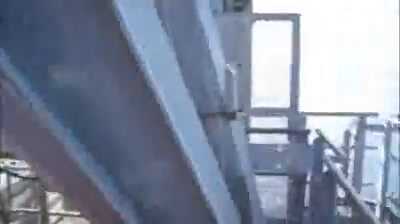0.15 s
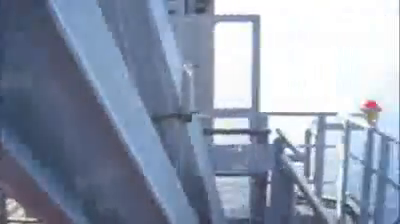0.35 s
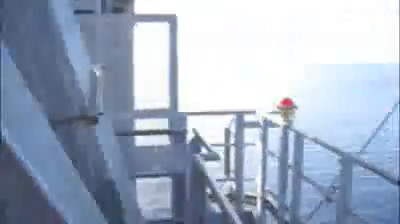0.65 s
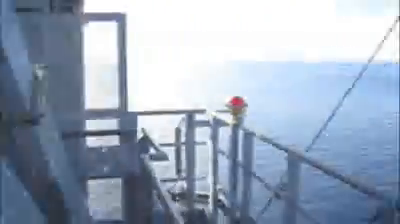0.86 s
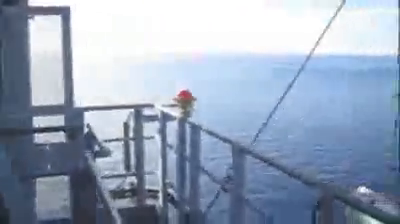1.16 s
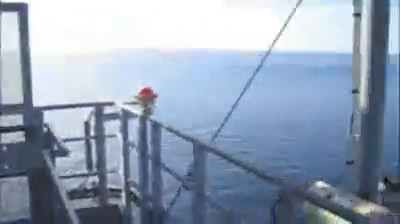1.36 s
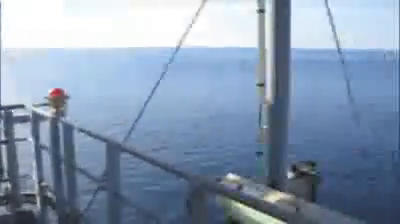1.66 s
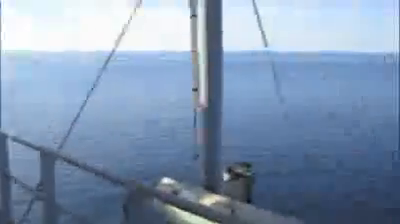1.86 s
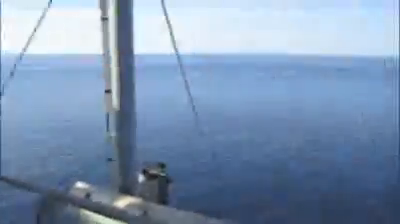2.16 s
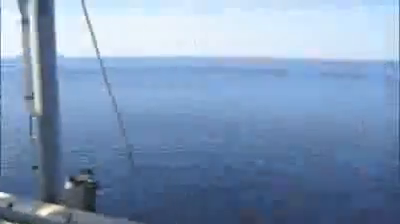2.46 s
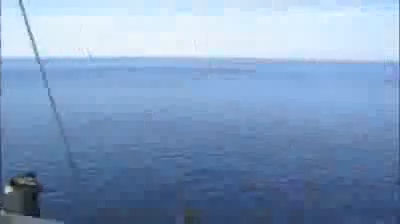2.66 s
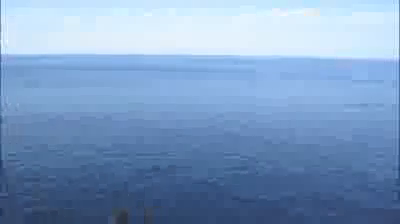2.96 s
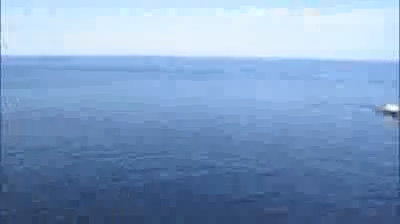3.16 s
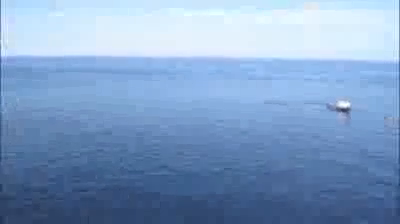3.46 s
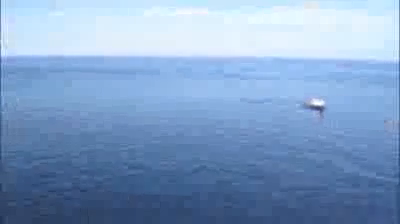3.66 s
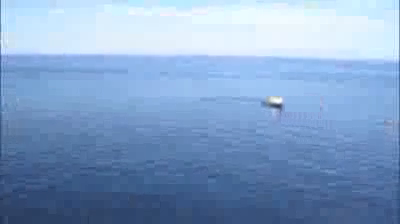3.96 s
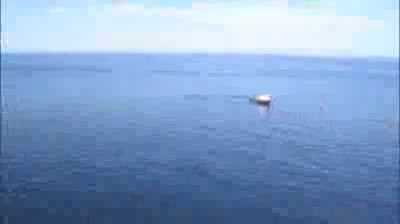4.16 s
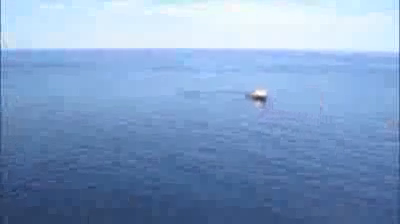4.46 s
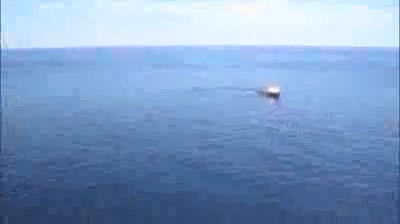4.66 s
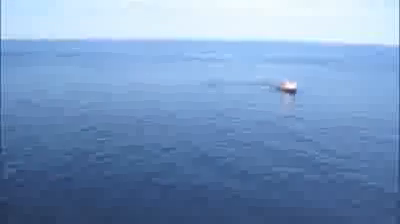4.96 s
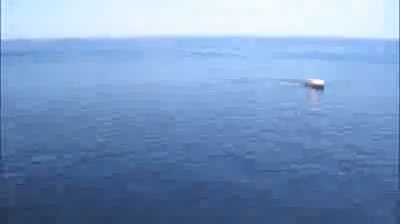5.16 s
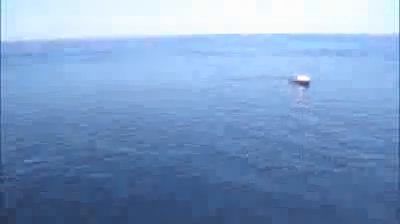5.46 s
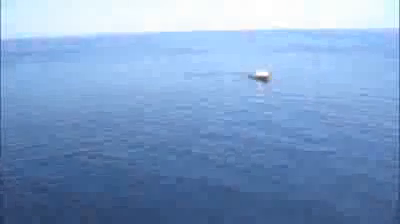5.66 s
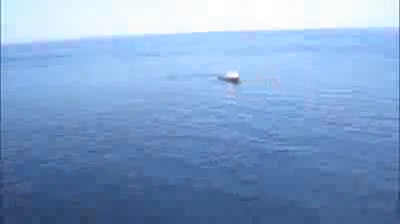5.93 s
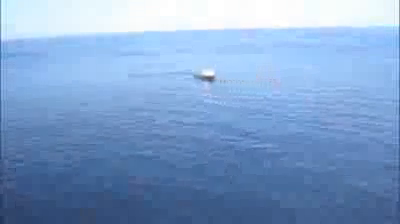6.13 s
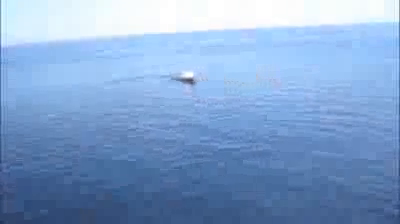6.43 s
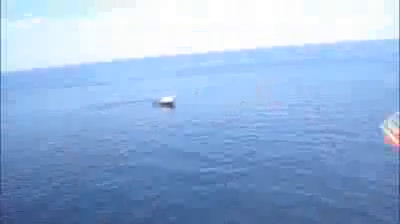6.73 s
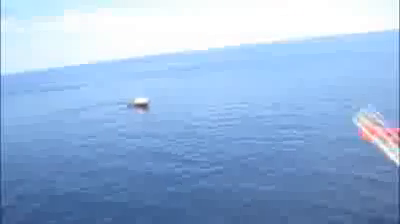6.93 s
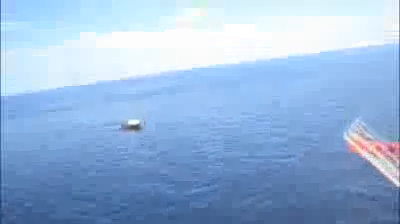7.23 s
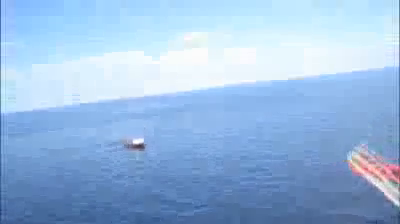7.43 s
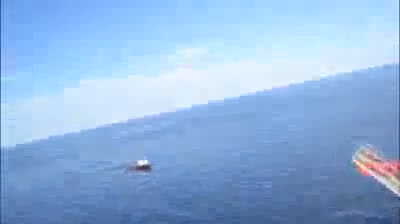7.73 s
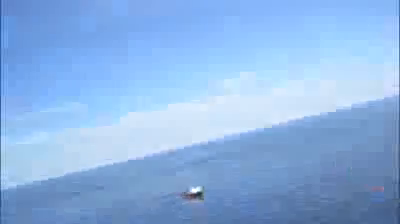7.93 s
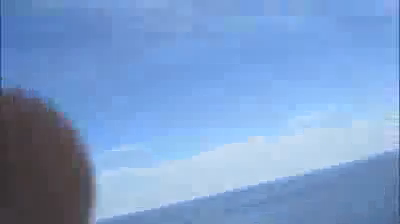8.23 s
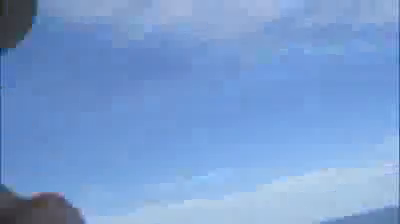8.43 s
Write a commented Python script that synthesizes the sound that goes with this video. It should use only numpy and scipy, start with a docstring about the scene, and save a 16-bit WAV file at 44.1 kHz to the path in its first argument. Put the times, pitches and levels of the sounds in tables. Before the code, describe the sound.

A loud, steady roar of exhaust and moving air fills the open deck of a drilling platform at sea. Two large blowers hum, swelling and fading about every two seconds, over a low diesel and pump drone, with uneven hiss and a faint high whine above. Past the middle, a hand clicks the camera case right at the microphone, and a few more clicks and soft rubs follow near the end.

```python
"""A broad roar of exhaust and moving air, heard from the open deck of a drilling platform at sea.
Two big blowers run at almost the same speed, so their hum swells and fades about every two seconds.
The hiss of the roar surges unevenly; diesel and pump lines hum below it, turbochargers whine above.
Right at the microphone a hand on the camera clicks its case once midway; clicks and rubs follow late.
Each source is built from noise bands, sine lines or struck resonances; a limiter follows them."""
import sys
import numpy as np
from scipy import signal
from scipy.io import wavfile

SR = 44100
rng = np.random.default_rng(int(sys.argv[2]) if len(sys.argv) > 2 else 0)


def generate_wav(sig):
    """Save sig (samples, or channels by samples) to the path in sys.argv[1] as 16-bit PCM at SR."""
    pcm = np.round(np.clip(np.atleast_2d(sig).T, -1, 1) * 32767).astype(np.int16)
    wavfile.write(sys.argv[1], SR, pcm)


N = 378819
TIME = np.arange(N) / SR
CUTOFF_HZ = 8600  # top of the microphone's band

# The camera swings out from behind steelwork to face the open sea: (start [s], end [s])
SWING_S = (0.26, 5)
# It then tilts up to the sky: (start [s], end [s]), with the level changes this brings [dB]
TILT_S = (6.9, 8.7)
TILT_BASS_DB, TILT_RUSH_DB, TILT_TREBLE_DB = -3, 0.1, 2.5
# The microphone is briefly shielded: middle [s], half length [s], treble change [dB]
SHIELD_AT_S, SHIELD_S, SHIELD_DB = 6.28, .36, -2

# Spectrum of the air and exhaust on deck: (frequency [Hz], relative level per Hz [dB])
ROAR_SPECTRUM = [(20, -15), (30, -8.5), (40, -2), (72, -2.5), (110, 5), (185, 4), (240, 0), (315, 0.5),
                 (380, -2), (500, -3.5), (800, -8.5), (1150, -9.5), (1500, -18.5), (2050, -20), (2600, -26),
                 (3700, -26), (4400, -31), (5200, -38.5), (6200, -41), (8000, -82)]
# Chance unevenness of the low rumble's noise: (middle [s], half length [s], change [dB])
RUMBLE_UNEVENNESS = [(1.33, .3, 2.5), (3.25, 0.072, 3), (4.9, 0.064, 1), (8.3, 0.2, -2.5)]
# Level of the middle rush at the moving camera: (time [s], level [dB])
RUSH_LEVEL = [(0, 0), (1.85, .5), (2.05, 0.2), (2.3, -0.1), (4.2, 0.7), (4.4, -0.2), (5.8, 0), (6.25, -2.6),
              (6.65, -1.5), (6.95, 1.4), (7.4, 1.2), (7.7, -.5), (7.95, 0), (8.15, 1), (8.6, 1)]
# Surges of the hiss, unevenly spaced: (crest [s], half length [s], rise [dB])
HISS_SURGES = [(.33, 0.21, 3), (1.68, .16, 3), (2.97, 0.11, 3.5), (3.6, 0.18, 1.7), (4.24, 0.15, 3),
               (5.1, .12, 1.8), (5.57, 0.12, 2.4), (6.87, .18, 2), (8.2, 0.069, 2.5)]
# Base levels of the roar's lows, middle and highs [dB]
RUMBLE_DB, RUSH_DB, HISS_DB = -25.5, -23.5, -24.5


def roar(flutter_db=1.4, rush_flutter_db=0.94, hidden_rumble_db=-4.0):
    """Turbulent air and exhaust: noise bands follow a rumble, a rush and a surging hiss."""
    tilt = ramp(TILT_S)
    hidden = 1 - ramp(SWING_S)
    rumble_db = RUMBLE_DB + TILT_BASS_DB * tilt + hidden_rumble_db * hidden + bumps(RUMBLE_UNEVENNESS)
    rush_db = RUSH_DB + TILT_RUSH_DB * tilt + in_time(RUSH_LEVEL)[0]
    hiss_db = HISS_DB + TILT_TREBLE_DB * tilt + shielding_db() + bumps(HISS_SURGES)
    centres, bands = noise_bands(ROAR_SPECTRUM, count=36)
    out = np.zeros(N)
    for hz, band in zip(centres, bands):
        # share of each range in this band
        low = np.interp(np.log(hz), np.log([140, 330]), [1, 0])
        high = np.interp(np.log(hz), np.log([1100, 1800]), [0, 1])
        middle = 1 - low - high
        level_db = low * rumble_db + middle * rush_db + high * hiss_db
        unrest_db = middle * rush_flutter_db + (low + high) * flutter_db
        out += band * from_db(level_db + unrest_db * drift(10.6))
    return out


BLADE_HZ = 206.55  # mean blade rate of the first blower
# Lead of the second blower, in step at whole numbers: (time [s], lead [blades])
BLOWER_LEAD = [(0, -.12), (1.3, .5), (3.19, 1.5), (4.97, 2.5), (5.35, 2.67), (5.8, 3.0), (6.7, 3.5),
               (7.0, 3.6), (7.5, 3.97), (8.1, 4.3), (8.4, 4.39), (8.6, 4.37)]
# Blower harmonics from the first up: (first blower [dB], second blower [dB],
# change of the first behind steelwork [dB], of the second [dB], waver [dB])
BLOWER_HARMONICS = [(-28.4, -29.1, 0, -6, .4), (-31.8, -36.3, 0, -22, .6), (-39.2, -53, -7, -7, 1.0)]
# Hum reaching the moving camera, harmonics one and three: (time [s], level [dB])
HUM_LEVEL = [(0, .6), (.7, .4), (1.8, 1.8), (2.3, 2), (2.8, 1.4), (3.3, -.5), (3.7, 1.8), (4.2, -.9),
             (4.7, 0), (5.8, .7), (6.5, -.5), (7.5, .5), (8.6, -1.5)]
# The hum's octave, which carries unevenly to the moving camera: (time [s], level [dB])
OCTAVE_LEVEL = [(0, -5), (.35, -2), (.63, -9), (1.1, 4), (1.47, -6), (1.8, 3), (2.1, -2), (2.35, -14),
                (2.55, -.5), (2.85, -1), (3.15, 3), (3.45, 1), (3.62, -3.5), (3.95, 2.5), (4.25, 0),
                (4.45, -4.5), (4.7, -.5), (5.1, 1.2), (5.45, -1), (6.0, 2.2), (6.25, 4), (6.5, -5),
                (6.95, 3), (7.35, -6), (7.7, -1), (8.0, -9), (8.45, 2), (8.6, 1)]


def blowers():
    """Two blade tones slide in and out of step; harmonic k beats k times as fast."""
    first = BLADE_HZ * TIME + .03 * drift(.8)
    second = first + in_time(BLOWER_LEAD)[0]
    hidden = 1 - ramp(SWING_S)
    out = np.zeros(N)
    for k, harmonic in enumerate(BLOWER_HARMONICS, 1):
        first_db, second_db, first_hidden_db, second_hidden_db, waver_db = harmonic
        start = rng.random()
        path_db = in_time(OCTAVE_LEVEL if k == 2 else HUM_LEVEL)[0]
        first_level_db = first_db + first_hidden_db * hidden + path_db
        second_level_db = second_db + second_hidden_db * hidden + path_db
        out += tone(k * first + start, first_level_db, waver_db)
        out += tone(k * second + start, second_level_db, waver_db)
    return out


# Clicks right at the microphone: (time [s], peak level [dB], most excited frequency [Hz],
# spread [octaves], rebound [+1 a second push, -1 a snap back], crunch [0-1])
CASE_CLICKS = [(5.3522, -15.5, 1400, .8, .4, .03), (7.0292, -4.6, 5100, 1.2, -1, .13),
               (7.5648, -12, 2400, 1.05, 1, .02), (7.7535, -23, 2100, .8, 0, .1)]
# Modes of the camera case: (frequency [Hz], relative level [dB], decay by 60 dB [s])
CASE_MODES = [(1000, 6, .007), (1850, 3, .006), (2850, -2, .004), (3750, 2, .005), (4600, 2, .005),
              (6400, 3.5, .006), (7200, 0, .004), (8000, -2, .004)]


def case_clicks(rebound_s=.00034, crunch_s=.0012, tail=.018, tail_s=.012):
    """A contact, rebound and crunch ring the plastic case's modes; a faint noisy tail follows."""
    out = np.zeros(N)
    t = TIME[:SR // 20]
    for at_s, peak_db, centre_hz, octaves, rebound, crunch in CASE_CLICKS:
        roughness = crunch * np.exp(-t / crunch_s) + tail * np.exp(-t / tail_s)
        push = rng.standard_normal(len(t)) * roughness
        push[[0, round(rebound_s * SR)]] += [1, rebound]
        # a soft contact holds back the treble
        soft_hz = min(centre_hz * 2 ** octaves, .4 * SR)
        push = signal.sosfilt(signal.butter(2, soft_hz, fs=SR, output="sos"), push)
        click = np.zeros(len(t))
        for k, (hz, db, t60) in enumerate(CASE_MODES):
            share = np.exp(-.5 * (np.log2(hz / centre_hz) / octaves) ** 2)
            width_hz = np.log(1000) / (np.pi * t60)
            click += (-1) ** k * share * from_db(db) * resonance(push, hz, width_hz)
        at = round(at_s * SR)
        out[at:at + len(t)] += from_db(peak_db) * click / np.abs(click).max()
    return out


# Fingers sliding on the case: (middle [s], half length [s], friction level [dB],
# ring frequency [Hz], ring over friction [dB])
FINGER_RUBS = [(6.87, .07, -43, 2300, -2), (7.45, .06, -47, 3000, -1), (7.60, .05, -43.5, 6300, -3),
               (7.7, .2, -44, 6000, -10), (7.725, .025, -48.5, 3300, 9), (7.76, .035, -45.5, 2000, 1),
               (8.25, .55, -46.5, 2000, -3)]
# Spectrum of the friction: (frequency [Hz], relative level per Hz [dB])
RUB_SPECTRUM = [(800, -13.5), (1800, 11.5), (3300, 7), (4800, 7.5), (6200, 4.5), (8000, -30.5)]


def finger_rubs(grain_db=1.2, ring_width_hz=310):
    """Skin catches and slips on the case in grainy strokes, each with a ring of its own."""
    friction = noise_bands(RUB_SPECTRUM, count=8)[1].sum(axis=0)
    grain = rms_one(from_db(grain_db * drift(120)))
    out = np.zeros(N)
    for at_s, half_s, db, ring_hz, ring_db in FINGER_RUBS:
        ring = rms_one(resonance(rng.standard_normal(N), ring_hz, ring_width_hz))
        out += from_db(db) * bump(at_s, half_s) ** 2 * (friction + from_db(ring_db) * ring)
    return out * grain


CYCLE_HZ = 7.494  # four-stroke cycle
# Diesel lines as multiples of the four-stroke cycle: (order)
DIESEL_ORDERS = [4, 7, 8, 9, 10, 11, 12, 14, 17, 19]
# Their levels before the tilt, in the same order: (level [dB])
DIESEL_LEVELS = [-43.5, -48, -54, -41, -48, -47.5, -42.5, -33.5, -45.5, -51]
DRONE_ORDER = 36  # strong upper line
# Level of that upper line: (time [s], level [dB])
DRONE_LEVEL = [(0, -36), (.9, -35.5), (1.6, -30), (3.1, -33), (4.0, -40.5), (6.8, -49), (7.4, -32.5),
               (8.6, -42)]


def diesels():
    """Governed engines sound multiples of their firing cycle."""
    cycles = CYCLE_HZ * TIME + 0.0017 * drift(0.7)
    tilt_db = TILT_BASS_DB * ramp(TILT_S)
    out = tone(DRONE_ORDER * cycles, in_time(DRONE_LEVEL)[0], waver_db=0.0)
    for order, db in zip(DIESEL_ORDERS, DIESEL_LEVELS):
        out += tone(order * cycles + rng.random(), db + tilt_db, waver_db=1.2)
    return out


# Pumps and motors in the engine room: (frequency [Hz], level before the tilt [dB])
PUMP_LINES = [(45.8, -45.5), (84.9, -37.5), (121.1, -45.5), (127.4, -44.5), (135.8, -44.5), (160.5, -38),
              (186.5, -46.5), (233, -47), (327.5, -45), (474, -42.5), (539, -52), (802, -52.5), (889, -55),
              (1301, -56.5)]


def pumps():
    """Each motor in the engine room hums at a speed of its own."""
    tilt_db = TILT_BASS_DB * ramp(TILT_S)
    out = np.zeros(N)
    for hz, db in PUMP_LINES:
        turns = hz * TIME + rng.random() + 0.099 * drift(0.56)
        out += tone(turns, db + tilt_db, waver_db=2.0)
    return out


# Turbocharger whistles: (frequency [Hz], width of each resonance pass [Hz], relative level [dB])
WHISTLES = [(5500, 90, -15), (7138, 45, 0), (7120, 173, -4), (8110, 130, -3.5)]
# Brief changes of the whine: (crest [s], half length [s], change [dB])
WHINE_CHANGES = [(.22, 0.12, 5), (3.2, 0.057, -0.5), (3.9, 0.07, 2), (5.93, 0.056, 2), (7.42, 0.13, 7.5)]
WHINE_DB = -54.8  # base level


def turbochargers(flicker_db=1.0, sway_db=0.5):
    """Thin, unsteady blade whistles: noise passed twice through narrow resonances."""
    whistles = np.zeros(N)
    for hz, width_hz, db in WHISTLES:
        once = resonance(rng.standard_normal(N), hz, width_hz)
        whistles += from_db(db) * rms_one(resonance(once, hz, width_hz))
    level_db = WHINE_DB + shielding_db() + bumps(WHINE_CHANGES)
    return whistles * from_db(level_db + flicker_db * drift(9.8) + sway_db * drift(4.1))


def tone(turns, level_db, waver_db):
    """A machine line of about the given rms level, wavering in the moving air."""
    gain = from_db(level_db + waver_db * drift(3.4))
    return np.sqrt(2) * gain * np.sin(2 * np.pi * turns)


def noise_bands(spectrum, count):
    """Centres and bands of noise that follow a spectrum; together they have rms 1."""
    hz, db = np.transpose(spectrum)
    edges = np.geomspace(hz[0], CUTOFF_HZ, count + 1)
    centres = np.sqrt(edges[1:] * edges[:-1])
    gains = from_db(np.interp(np.log(centres), np.log(hz), db))
    # neighbouring bands take turns between two noises
    white = rng.standard_normal((2, N))
    bands = np.zeros((count, N))
    for k in range(count):
        band_pass = signal.butter(3, edges[k:k + 2], "band", fs=SR, output="sos")
        bands[k] = gains[k] * signal.sosfilt(band_pass, white[k % 2])
    return centres, bands / bands.sum(axis=0).std()


def resonance(x, hz, width_hz):
    """Two-pole resonance with a gain of about 1 on top."""
    r = np.exp(-np.pi * width_hz / SR)
    zeros = np.array([1, 0, -1]) * (1 - r * r) / 2
    poles = [1, -2 * r * np.cos(2 * np.pi * hz / SR), r * r]
    return signal.lfilter(zeros, poles, x + 1e-18)


def drift(rate_hz):
    """Smoothed noise of rms 1 that changes about rate_hz times a second."""
    step = 40  # samples between drawn values
    r = np.exp(-2 * np.pi * rate_hz * step / SR)
    settle = 4000
    white = rng.standard_normal(N // step + settle + 2)
    slow = signal.lfilter([1], [1, -2 * r, r * r], white)[settle:]
    return np.interp(np.arange(N) / step, np.arange(len(slow)), rms_one(slow))


def ramp(span_s):
    """A camera move: 0 before it, 1 after it."""
    return np.interp(TIME, span_s, [0, 1])


def bump(at_s, half_s):
    """A smooth rise and fall of height 1."""
    return np.exp(-((TIME - at_s) / half_s) ** 2)


def bumps(rows):
    """A table of brief smooth changes as a level in dB."""
    return sum(db * bump(at_s, half_s) for at_s, half_s, db in rows)


def shielding_db():
    """The smooth treble dip while the microphone is shielded."""
    return SHIELD_DB * bump(SHIELD_AT_S, SHIELD_S)


def in_time(rows):
    """The columns of a curve, one value per sample."""
    at_s, *columns = np.transpose(rows)
    return [np.interp(TIME, at_s, column) for column in columns]


def from_db(db):
    """Decibels to gain."""
    return np.exp(np.asarray(db) * np.log(10) / 20)


def rms_one(x):
    """Scale to unit rms."""
    return x / np.sqrt(np.mean(x ** 2) + 1e-20)


def limiter(x, top_db=-8.3, release_db_per_s=22, attack_s=.001):
    """A peak over the top ducks the gain, which then creeps back."""
    over_db = np.maximum(20 * np.log10(np.abs(x) + 1e-9) - top_db, 0)
    recovery_db = release_db_per_s * TIME
    held_db = np.maximum.accumulate(over_db + recovery_db, axis=-1) - recovery_db
    r = np.exp(-1 / (attack_s * SR))
    return x * from_db(-signal.lfilter([1 - r], [1, -r], held_db))


def overload(x, top=.48):
    """The input stage flattens the very highest peaks."""
    return x / (1 + (x / top) ** 10) ** .1


def scene():
    """The platform's machines across the deck, and the hand at the microphone."""
    air = roar() + blowers()
    hand = case_clicks() + finger_rubs()
    machines = diesels() + pumps() + turbochargers()
    return (air + hand + machines)[None]


def record(dry):
    """A small camera microphone with a limiter, an input stage and a narrow band."""
    low_pass = signal.firwin(201, CUTOFF_HZ, window="blackman", fs=SR)
    return signal.fftconvolve(overload(limiter(dry)), low_pass[None], "same")


dry = scene()
out = record(dry)
generate_wav(out)
```